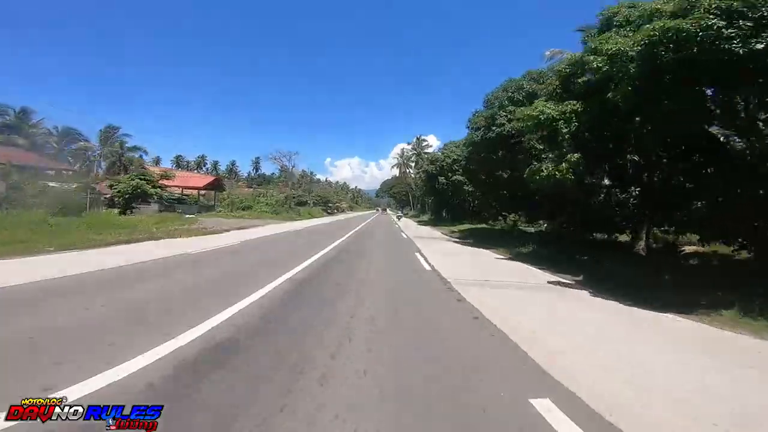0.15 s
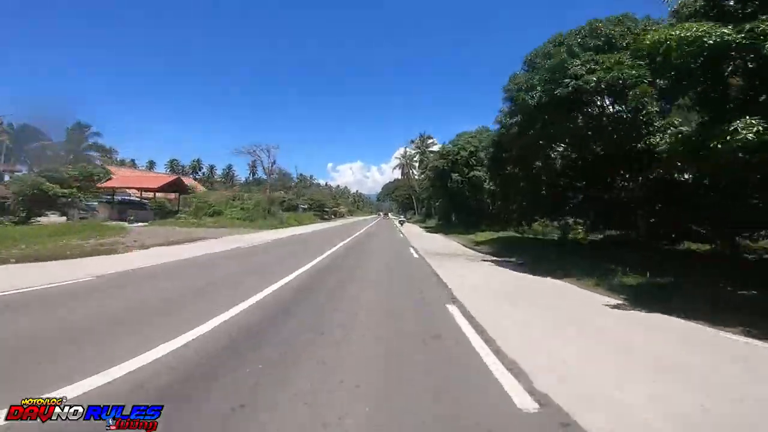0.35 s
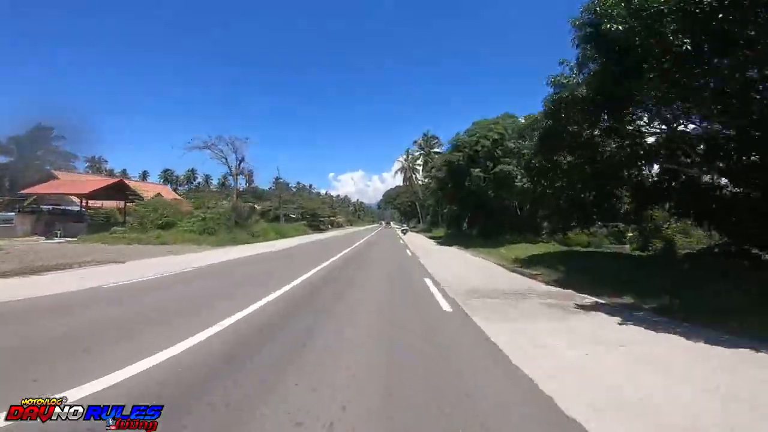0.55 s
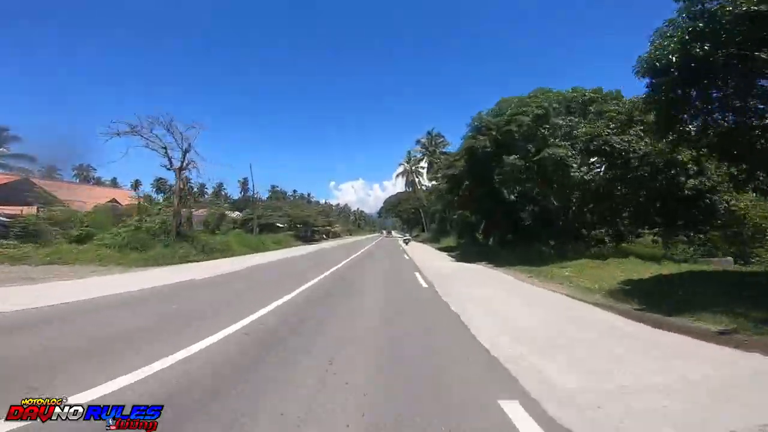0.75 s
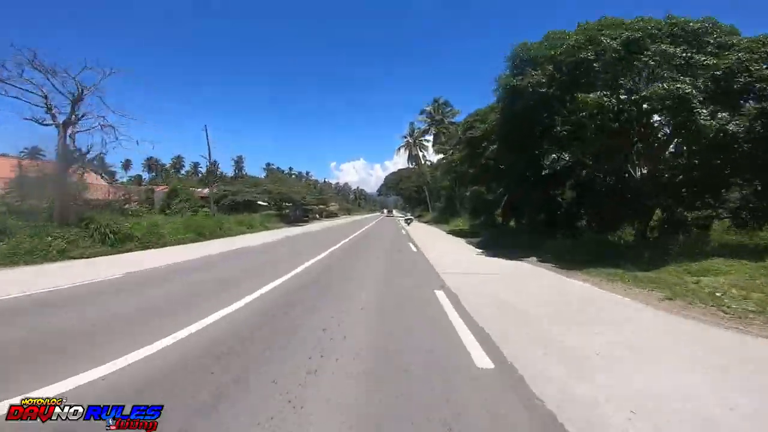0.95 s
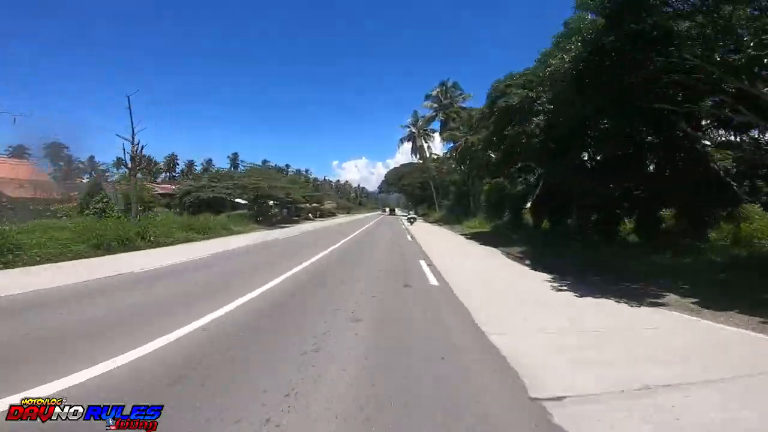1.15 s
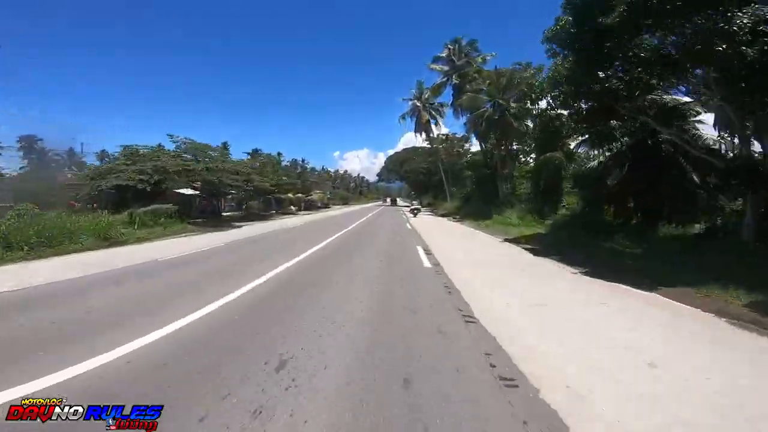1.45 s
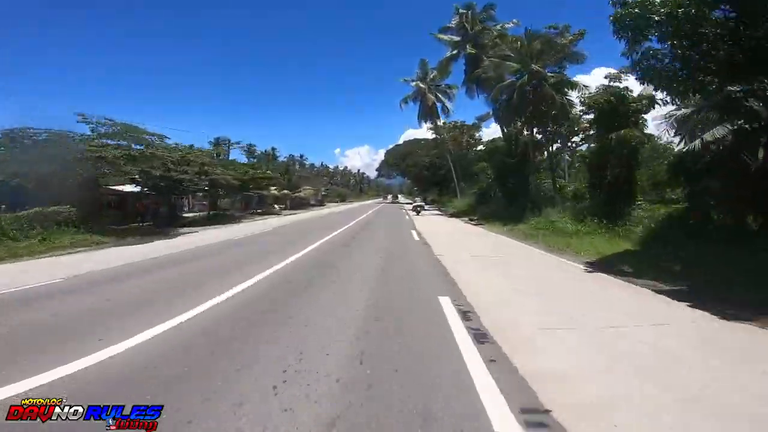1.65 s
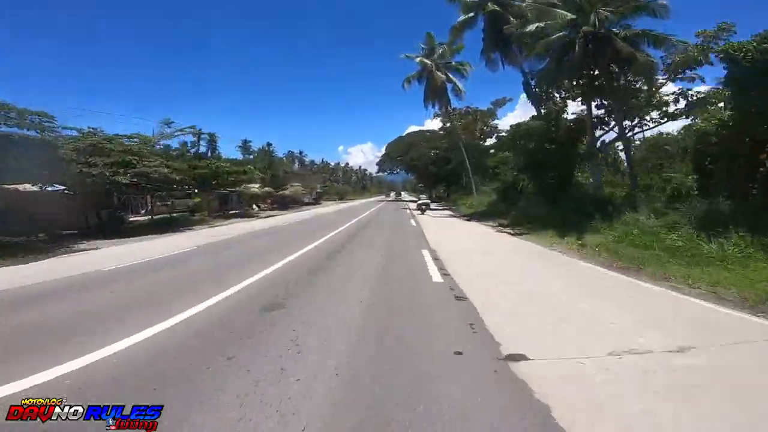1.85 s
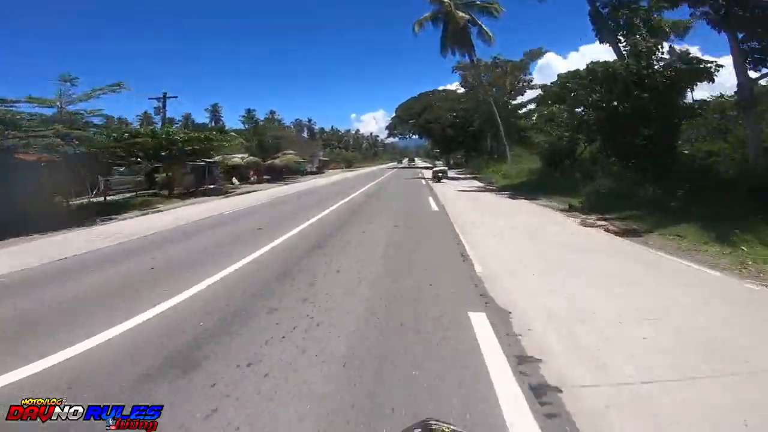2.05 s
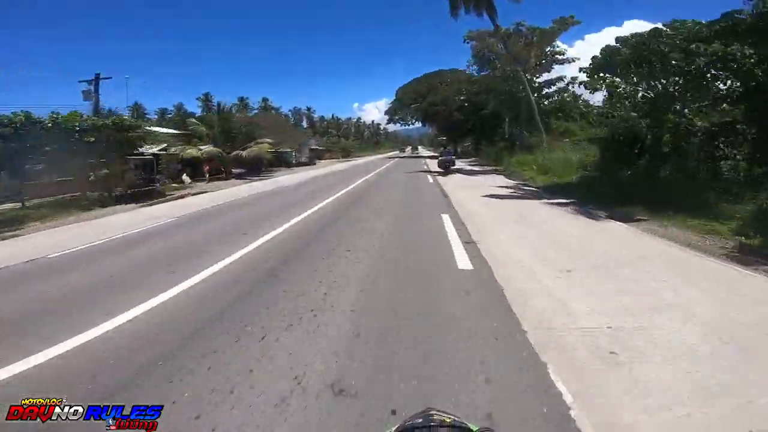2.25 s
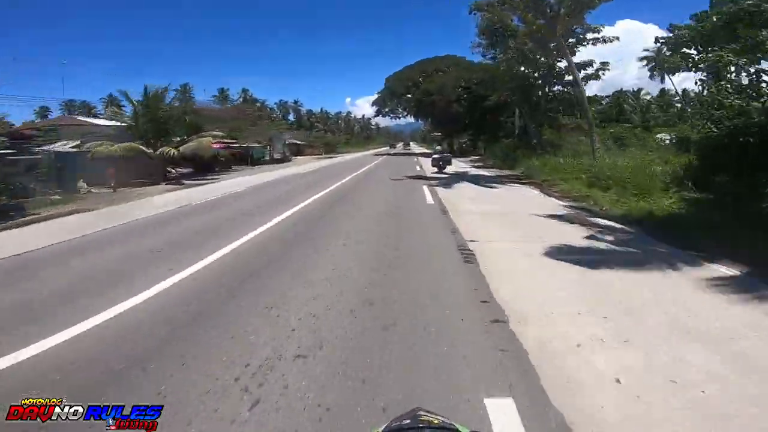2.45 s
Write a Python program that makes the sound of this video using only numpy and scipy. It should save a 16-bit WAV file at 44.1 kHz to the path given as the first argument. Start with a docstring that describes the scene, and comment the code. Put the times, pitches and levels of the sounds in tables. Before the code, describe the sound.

Motorcycle engine heard on board, a fast buzzing exhaust throb gradually slowing, with low wind rumble

```python
"""A single-cylinder motorcycle, heard from the rider's place on a country road, slows as the throttle is eased.
Each firing is a ringing exhaust thump and a sharp crack, built from harmonics of the firing rate,
plus a decaying puff of noise for the rushing gas; one firing misses.
Harmonics make the valve clatter and filtered noise the casing rasp, with two faint rattles on top.
The bed is coloured noise: a fluttering rush of air and tyres, a thin hiss and wind on the microphone."""
import sys
import numpy as np
from scipy import signal
from scipy.fft import rfft, irfft
from scipy.io import wavfile
from scipy.ndimage import uniform_filter1d

SR = 44100
rng = np.random.default_rng(int(sys.argv[2]) if len(sys.argv) > 2 else 0)


def put_to_file(sound):
    """Save the sound as 16-bit audio at rate SR, in the file named by the first command-line argument."""
    columns = np.atleast_2d(sound).T  # one column per channel
    safe = np.clip(columns, -1, 1)
    whole_steps = np.round(safe * 32767)
    wavfile.write(sys.argv[1], SR, whole_steps.astype(np.int16))


N = 114660
TIME = np.arange(N) / SR  # s


def from_db(db):
    """Decibels to gain."""
    return 10 ** (np.asarray(db) / 20)


def rms_one(x):
    """Scale to an rms of 1."""
    return x / np.sqrt(np.mean(x ** 2) + 1e-20)


def in_time(rows):
    """Draw an automation curve through (time, value) points, one value per sample."""
    return np.interp(TIME, *np.transpose(rows))


def drift(rate_hz):
    """Slow random movement with a spread of 1: white noise through two equal low-pass poles."""
    step = 40  # samples between control points
    pole = np.exp(-2 * np.pi * rate_hz * step / SR)
    white = rng.standard_normal(N // step + 2002)
    slow = signal.lfilter([1], [1, -2 * pole, pole * pole], white)[2000:]  # drop the filter's run-in
    return np.interp(np.arange(N) / step, np.arange(len(slow)), rms_one(slow))


def noise(spectrum):
    """Noise shaped to a spectrum, falling away beyond its ends; rms 1."""
    hz, db = np.transpose(spectrum)
    f = np.maximum(np.arange(N // 2 + 1) * SR / N, 1)
    skirts = 1 / np.sqrt((1 + (hz[0] / f / 2) ** 6) * (1 + (f / hz[-1] / 2) ** 6))
    colour = from_db(np.interp(np.log(f), np.log(hz), db)) * skirts
    return rms_one(irfft(rfft(rng.standard_normal(N)) * colour, N))


# colour of the air and tyre rush: f/Hz, relative level/dB per Hz
RUSH_COLOUR = [(100, -8), (200, 1.5), (330, -5.5), (480, -10), (620, -14), (850, -17), (1000, -23),
               (1300, -22), (1800, -28.5), (2200, -38), (3000, -45), (5000, -66)]
RUSH_EASED_DB, RUSH_OPEN_BOOST_DB = -28.25, 1.5


def air_and_tyre_rush(throttle, flutter_db):
    """Turbulent air and tyres as broadband noise, fluttering at random, a touch louder with throttle."""
    level_db = RUSH_EASED_DB + RUSH_OPEN_BOOST_DB * throttle + flutter_db * drift(14)
    return from_db(level_db) * noise(RUSH_COLOUR)


# colour of the airstream hiss: f/Hz, relative level/dB per Hz
HISS_COLOUR = [(2000, 2.5), (2800, 3), (3400, 1), (5000, -6.5), (6600, -6), (7800, -16), (9300, -16.5),
               (10500, -28), (12000, -24.5), (15500, -31)]
# moves of the hiss: t/s, relative level/dB
HISS_MOVES = [(0.0, -61), (0.24, -61), (0.35, -64), (0.85, -62.5), (0.89, -66.5), (0.92, -61.5),
              (1.19, -66), (2.29, -67.5), (2.32, -63.5), (2.34, -67), (2.41, -65), (2.55, -66.5)]
HISS_TRIM_DB = 8


def airstream_hiss():
    """The fine turbulence of the airstream: a thin bright noise whose level shifts."""
    return from_db(HISS_TRIM_DB + in_time(HISS_MOVES)) * noise(HISS_COLOUR)


# colour of the wind on the microphone: f/Hz, relative level/dB per Hz
WIND_COLOUR = [(7, 1.5), (13, 3), (20, -1.5), (30, -4), (48, -6.5), (70, -11), (110, -11.5), (190, -15.5),
               (280, -27.5), (450, -38)]
# gusts of the wind: t/s, relative level/dB
WIND_GUSTS = [(0, -15), (.25, -17.5), (.55, -19.5), (.82, -15), (1.0, -21.5), (1.35, -17), (1.7, -20.5),
              (2.0, -21), (2.6, -21.5)]
WIND_TRIM_DB = 2.5


def wind_on_microphone(buffet_db):
    """Gusts pressing on the microphone: low rumbling noise with a slight random buffeting."""
    level_db = WIND_TRIM_DB + in_time(WIND_GUSTS) + buffet_db * drift(13)
    return from_db(level_db) * noise(WIND_COLOUR)


# faint rattles of loose parts: t/s, relative level/dB
RATTLE_HITS = [(2.081, -46), (2.317, -41.5)]
RATTLE_DECAY_S, RATTLE_LOWPASS_HZ = .002, 4500


def rattles():
    """Loose parts knocking: tiny bursts of noise that start at once, die fast and lose some treble."""
    envelope = np.zeros(N)
    for start_s, db in RATTLE_HITS:
        envelope += from_db(db) * (TIME >= start_s) * np.exp(-np.abs(TIME - start_s) / RATTLE_DECAY_S)
    lowpass = signal.butter(1, RATTLE_LOWPASS_HZ, fs=SR, output="sos")
    return signal.sosfilt(lowpass, envelope * rng.standard_normal(N)) / 2


# colour of the engine casing, ringing with the moving parts: f/Hz, relative level/dB per Hz
CASING_COLOUR = [(2000, -22), (2300, -4.5), (2550, -4), (2900, -0.5), (3100, -10), (3400, -25),
                 (5000, -51.5)]
CASING_EASED_DB = -62.5


def casing_rasp(throttle, load_db):
    """The casing's resonant band as a thin metallic noise that grows a little with the throttle."""
    return from_db(CASING_EASED_DB + load_db * throttle) * noise(CASING_COLOUR)


# valve clatter, the same in every cycle: order/(multiple of firing rate), relative level/dB
CLATTER_HARMONICS = [(28, -64), (34, -61.5), (40, -65.5), (47, -66.5), (52, -74), (56, -84.5)]
CLATTER_EASED_DB, CLATTER_OPEN_CUT_DB = -26.5, 7


def valve_clatter(cycle, throttle, count=56):
    """Many small valve knocks as high harmonics in random phase, a fine buzz spread over the cycle."""
    orders, db = np.transpose(CLATTER_HARMONICS)
    phase_turns = rng.random(count + 1)
    buzz = np.zeros(N)
    for k in range(count // 2, count + 1):
        buzz += from_db(np.interp(k, orders, db)) * np.cos(2 * np.pi * (k * cycle + phase_turns[k]))
    level_db = CLATTER_EASED_DB - CLATTER_OPEN_CUT_DB * throttle
    return np.sqrt(2) * from_db(level_db) * buzz


def causal_response(orders, db, skirt_db, size=128):
    """Log gain and minimum phase per harmonic of a pipe that rings after the blow; skirts in dB/octave."""
    octave, known = np.log2(np.maximum(np.arange(size + 1), .5)), np.log2(orders)
    outside = np.abs(octave - np.clip(octave, known[0], known[-1]))
    level_db = np.interp(octave, known, db) - skirt_db * outside
    cepstrum = irfft(np.log(from_db(level_db)))
    # folding the cepstrum forward puts all the ringing after the blow
    fold = np.r_[1, np.full(size - 1, 2), 1, np.zeros(size - 1)]
    return rfft(cepstrum * fold)


def pulses(cycle, throttle, table, skirt_db, top_order, count):
    """One ringing pulse per cycle, morphing from eased to open; its edge is rounded above top_order."""
    orders, open_db, eased_db = np.transpose(table)
    opened = causal_response(np.round(orders), open_db, skirt_db)
    eased = causal_response(np.round(orders), eased_db, skirt_db)
    out = np.zeros(N)
    for k in range(1, count + 1):
        response = eased[k] + throttle * (opened[k] - eased[k])
        gain = np.exp(response.real - (k / top_order) ** 5.2)
        out += gain * np.cos(2 * np.pi * k * cycle + response.imag)
    return np.sqrt(2) * out


MISS_S = 1.495  # time of the missed firing


def firing_strength(cycle, scatter_db, miss_db):
    """Each firing burns with a random strength of its own; the missed one is weak."""
    firing = np.floor(cycle + .08).astype(int) + 1  # steps just ahead of each firing
    db = scatter_db * rng.standard_normal(size=256)
    db[firing[int(MISS_S * SR)]] = miss_db
    return uniform_filter1d(from_db(db[firing]), size=64)  # smooths the steps


# colour of the gas rush after each firing: f/Hz, relative level/dB per Hz
PUFF_COLOUR = [(200, -1), (400, 8), (620, -2), (850, -2), (1400, -6.5), (1900, -16.5), (2800, -25),
               (4500, -43), (9000, -62)]
PUFF_EASED_DB, PUFF_OPEN_BOOST_DB = -40.1, 1.8
PUFF_DECAY_S, PUFF_LEAD_S = .011, .0005


def gas_puff(cycle, rate, throttle):
    """Gas rushing out: noise gated afresh just ahead of each firing and dying away exponentially."""
    age_s = (cycle + PUFF_LEAD_S * rate) % 1 / rate
    gate = rms_one(uniform_filter1d(np.exp(-age_s / PUFF_DECAY_S), size=40))
    return from_db(PUFF_EASED_DB + PUFF_OPEN_BOOST_DB * throttle) * gate * noise(PUFF_COLOUR)


# crack: order/(multiple of firing rate), relative level/dB throttle open, relative level/dB eased
CRACK_HARMONICS = [(9, -58.5, -46), (10, -46, -52.5), (11, -42.5, -58.5), (12, -37.5, -55),
                   (13, -37.5, -41.5), (14, -48.5, -46), (15, -59, -47.5), (16, -44.5, -52.5),
                   (17, -42.5, -44.5), (18, -46, -46.5), (20, -45.5, -44), (21, -50, -55.5),
                   (22, -42.5, -52.5), (23, -44.5, -49.5), (24, -45, -53), (25, -53, -62), (27, -52, -53.5),
                   (29, -51, -63.5), (31, -65, -54), (38, -65.5, -65)]
CRACK_TRIM_DB, CRACK_SCATTER_DB, CRACK_MISS_DB = -0.52, .7, -15
SOFTEN_FROM_S, SOFTEN_DB_PER_S = 2.38, 18  # the crack and puff fade near the end


def firing_crack(cycle, rate, throttle):
    """The sharp pressure edge of each firing with its puff of gas, both as strong as the firing."""
    strength = firing_strength(cycle, CRACK_SCATTER_DB, CRACK_MISS_DB)
    strength = strength * from_db(-SOFTEN_DB_PER_S * np.maximum(TIME - SOFTEN_FROM_S, 0))
    edge = pulses(cycle, throttle, CRACK_HARMONICS, skirt_db=4, top_order=46.2, count=56)
    crack = -from_db(CRACK_TRIM_DB) * edge  # opposite polarity to the thump
    return strength * (crack + gas_puff(cycle, rate, throttle))


# thump: order/(multiple of firing rate), relative level/dB throttle open, relative level/dB eased
THUMP_HARMONICS = [(1, -35, -41.5), (2, -20, -16.5), (3, -18.5, -17.5), (4, -34.5, -25.5),
                   (5, -24.5, -30.5), (6, -26.5, -26.5), (7, -29, -34), (8, -46, -35.5), (9, -57.5, -51.5)]
# swell of the thump: t/s, relative level/dB
THUMP_MOVES = [(0, 1), (.2, 0.5), (.4, -.5), (.58, 1), (.82, 0.5), (.95, 0.3), (1.2, 0.4), (1.4, -1),
               (1.65, -1.6), (1.9, .5), (2.6, 0.2)]
THUMP_TRIM_DB, THUMP_SCATTER_DB, THUMP_MISS_DB = -0.75, .6, -5
THUMP_LAG_S = .0001


def exhaust_thump(cycle, rate, throttle):
    """The silencer's deep ring after each firing, from low harmonics of the firing rate."""
    late_cycle = cycle - THUMP_LAG_S * rate
    ring = pulses(late_cycle, throttle, THUMP_HARMONICS, skirt_db=21.5, top_order=15.5, count=12)
    strength = firing_strength(cycle, THUMP_SCATTER_DB, THUMP_MISS_DB)
    return from_db(THUMP_TRIM_DB + in_time(THUMP_MOVES)) * ring * strength


# engine speed: t/s, firing rate f/Hz
FIRING_RATE = [(0.0, 67.25), (0.3, 66.53), (0.45, 65.2), (0.6, 65.11), (0.78, 63.44), (1.0, 62.88),
               (1.4, 60.84), (1.8, 59.41), (2.0, 58.09), (2.3, 57.45), (2.6, 55.62)]
# throttle: t/s, opening/1 (0 eased, 1 open)
THROTTLE_MOVES = [(0, 0.99), (.4, 1), (1.2, 0.56), (1.9, 0.13), (2.6, 0.082)]
FIRST_FIRING_S = .0027


def scene():
    """Mix the air bed, rattles and engine at one microphone, all engine pulses sharing one cycle."""
    rate, throttle = in_time(FIRING_RATE), in_time(THROTTLE_MOVES)
    cycle = np.cumsum(rate) / SR - rate[0] * FIRST_FIRING_S  # firings elapsed
    air = air_and_tyre_rush(throttle, flutter_db=0.94) + airstream_hiss() + wind_on_microphone(buffet_db=0.1)
    mechanics = casing_rasp(throttle, load_db=1.2) + valve_clatter(cycle, throttle)
    exhaust = firing_crack(cycle, rate, throttle) + exhaust_thump(cycle, rate, throttle)
    return (air + rattles() + mechanics + exhaust)[None]


FADE_IN_S, CEILING = .006, .97  # ceiling in full scale
STOPBAND_HZ = 15700 * 1.08


def record(dry):
    """A short fade-in, soft rounding of the highest peaks and a steep cut of the top."""
    x = dry * np.minimum(TIME / FADE_IN_S, 1)
    x = x / (1 + (x / CEILING) ** 10) ** .1
    return signal.sosfilt(signal.cheby2(12, 70, STOPBAND_HZ, fs=SR, output="sos"), x)


dry = scene()
out = record(dry)
put_to_file(out)
```